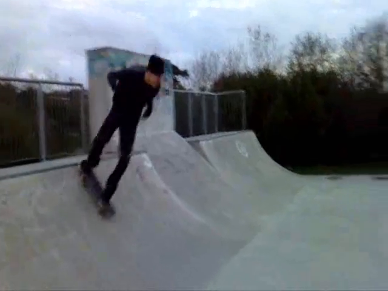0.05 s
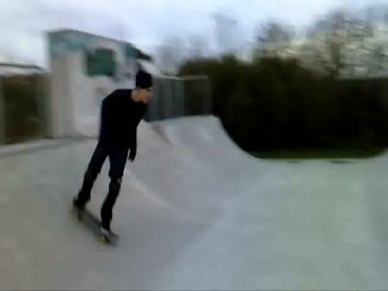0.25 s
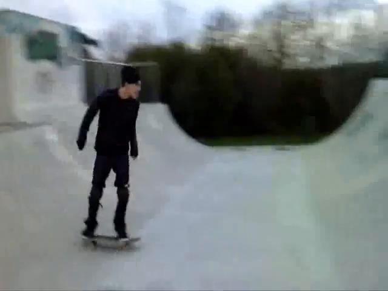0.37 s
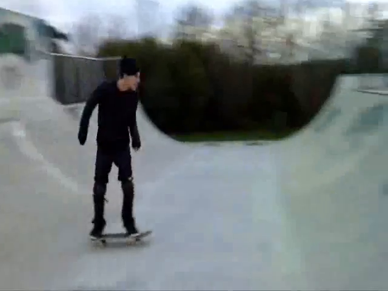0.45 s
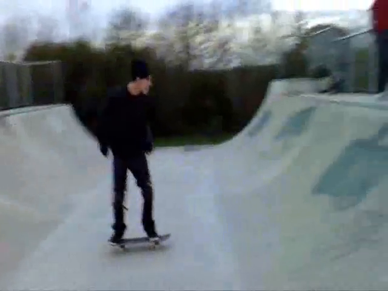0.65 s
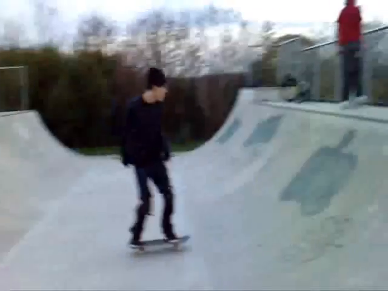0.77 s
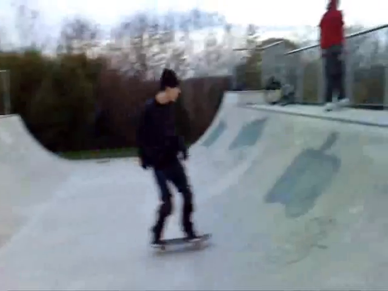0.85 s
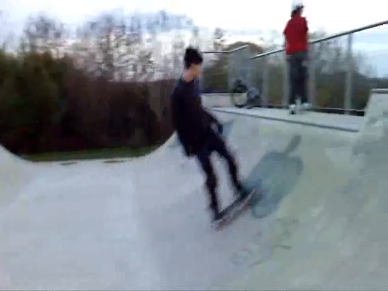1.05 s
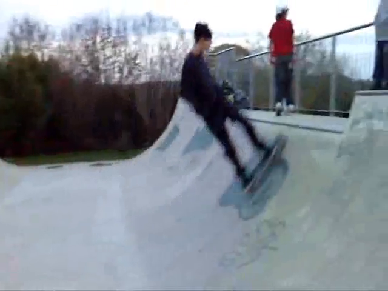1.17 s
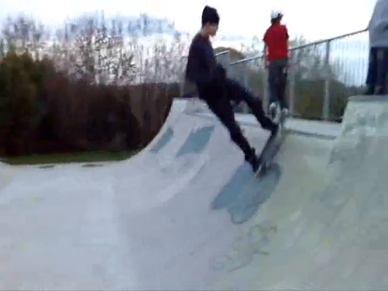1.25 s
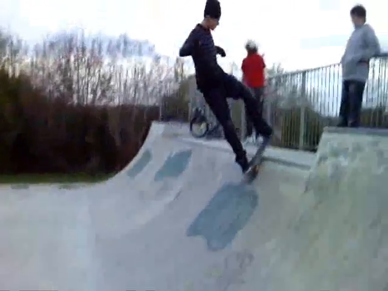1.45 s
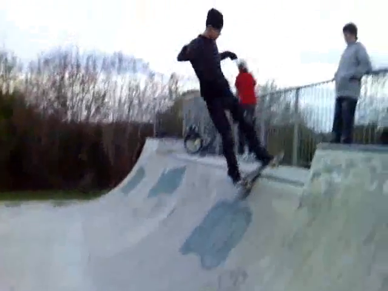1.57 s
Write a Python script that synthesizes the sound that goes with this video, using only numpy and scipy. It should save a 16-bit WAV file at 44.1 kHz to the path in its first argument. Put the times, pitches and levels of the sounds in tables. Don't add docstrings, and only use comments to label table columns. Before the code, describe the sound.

A skateboard drops into a concrete ramp with a hard slam, then rolls across with clacks

```python
import sys
import numpy as np
from scipy import signal
from scipy.io import wavfile
from scipy.ndimage import uniform_filter1d, map_coordinates

SR = 44100
rng = np.random.default_rng(int(sys.argv[2]) if len(sys.argv) > 2 else 0)


def dump(signal):
    limited = np.clip(np.atleast_2d(signal).T, -1, 1)
    pcm = np.round(limited * 32767).astype(np.int16)
    wavfile.write(sys.argv[1], SR, pcm)


def ratio(d):
    e = np.asarray(d, float) / 20
    return 10 ** e


N = 70560
T = np.arange(N) / SR


def level(x):
    return x / np.sqrt(np.mean(x ** 2))


def decay(t, t60):
    return np.exp(-np.log(1000) * t / t60)


def band(x, hz, width):
    b, a = signal.iirpeak(hz, hz / width, SR)
    return signal.lfilter(b, a, signal.lfilter(b, a, x))


def walk(rate):
    hold = int(SR / rate)
    steps = np.repeat(rng.standard_normal(N // hold + 1), hold)
    slewed = uniform_filter1d(uniform_filter1d(steps, hold), hold)
    return level(slewed[:N])


def park():
    # f/Hz, level/dB
    spectrum = [(30, 16), (100, -1), (300, -3.5), (850, 10.5), (1500, 4), (2600, -5), (5000, -6.5),
                (8000, -8), (12500, -19.5)]
    corner_hz, corner_db = np.array(spectrum).T
    out, swell = 0, walk(1.5)
    for hz in 30 * 2 ** np.arange(0, 8.8, .5):
        db = np.interp(np.log(hz), np.log(corner_hz), corner_db) + .6 * swell + walk(9)
        out = out + ratio(db) * band(rng.standard_normal(N), hz, hz / 2)
    return level(out) * ratio(-46)


def grit():
    bumps_per_s, spread_db = 3000, 2.2
    chance, size, sign = rng.random(N), rng.exponential(size=N), np.sign(rng.standard_normal(N))
    present = np.clip((bumps_per_s / SR - chance) * SR / 300, 0, 1)
    return level(present * sign * ratio(spread_db * size))


def rolling():
    # t/s, level/dB, load on the trucks/dB, wheel hiss/dB
    course = [(0, -87, -44, -18), (0.149, -58.5, -1, 3.5), (.27, -49.5, -2.5, -5), (.35, -41.5, -7, -2),
              (0.412, -35.5, -3.5, -8.5), (.47, -30, -2.5, -6.5), (.55, -29, -2.5, -4.5),
              (0.699, -28, -3, -5.5), (.765, -32, -4, -3), (.80, -35, -1.5, -2), (.92, -36.5, -1.5, -2.5),
              (1.017, -35, -1.5, -1), (1.028, -33.5, -13, -1), (1.099, -35.5, 3, -2),
              (1.219, -31.5, 0.5, -4.5), (1.36, -34.5, 4.5, -0.5), (1.49, -36, 1.5, -2.5),
              (1.6, -46, 3, 2.5)]
    # f/Hz, width/Hz, level/dB
    deck_ring = [(135, 36, -21), (263, 68, -15.5), (400, 113, -16), (543, 152, -5.5), (660, 125, 0.5),
                 (1080, 325, -8.5)]
    truck_ring = [(1380, 325, -5), (1641, 100, -5.5), (2004, 414, -2.5)]
    wheel_ring = [(3510, 580, -10), (4370, 570, -14), (4864, 720, -8), (6890, 720, -23), (8540, 3200, -34)]
    # t/s, resonance pitch ratio
    flexing = [(0, 1.19), (.4, 1.067), (.5, 0.992), (.7, 1.013), (.9, 1), (1.1, 1.02), (1.3, 0.94),
               (1.45, 0.91), (1.6, .85)]
    flicker_db, flicker_per_s, shared_db, shared_per_s = .7, 30, .7, 70

    s, base_db, load_db, hiss_db = np.array(course).T
    flex = np.interp(T, *np.array(flexing).T)
    shared = shared_db * walk(shared_per_s)
    common = grit()
    out = 0
    for part, extra_db, bend in ((deck_ring, 0, 1), (truck_ring, load_db, 0.79), (wheel_ring, hiss_db, 0)):
        bumps = common + grit()
        rings = 0
        for m, (hz, width, db) in enumerate(part):
            mode = level(band(bumps, hz, 1.59 * width)) * np.sqrt(width / 200)
            rings = rings + (-1) ** m * ratio(db + flicker_db * walk(flicker_per_s)) * mode
        rings = map_coordinates(rings, [np.cumsum(flex ** bend)], mode="mirror")
        out = out + ratio(np.interp(T, s, base_db + extra_db) + shared) * rings
    return out


def ring(x, hz, t60):
    r, w = decay(1, max(t60, 1e-3) * SR), 2 * np.pi * hz / SR
    return signal.lfilter([0, np.sin(w)], [1, -2 * r * np.cos(w), r * r], x)


def strikes(table, modes, crack_db):
    # f/Hz, width/Hz, level/dB
    crack = [(1260, 2150, -11), (2410, 3050, -14), (4170, 1500, -13.5), (6940, 4300, -27.5),
             (11600, 6500, -35)]
    rattle_per_s, crack_t60 = 7200, 0.044
    out, k = np.zeros(N), np.arange(3000) / SR
    for s, db, length, tilt_db in table:
        chance, force, detune = rng.random((3, len(k)))
        push = (chance < rattle_per_s / SR) * (2 * force - 1) * np.clip(2 * (1 - k / length), 0, 1)
        push[0] = 1
        push = push / np.sqrt(np.sum(push ** 2))
        noise = rng.standard_normal(len(k)) * decay(np.clip(k - length, 0, 1), crack_t60)
        y = 0
        for m, (hz, g, t60) in enumerate(modes):
            gain = (-1) ** m * ratio(g + tilt_db * np.log2(hz / 1000))
            y = y + gain * ring(push, hz * (1 + 0.017 * (detune[m] - .5)), t60)
        for hz, width, g in crack:
            gain = ratio(crack_db + g + tilt_db * np.log2(hz / 1000))
            y = y + gain * band(noise, hz, width) * np.sqrt(SR / width / 2)
        i = int(s * SR)
        out[i:i + len(y)] += ratio(db) * y[:N - i]
    return out


def scrape():
    # t/s, level/dB, rattle length/s, tilt/(dB per octave)
    contacts = [
        (.1900, -32, 0.024, -8),
        (.2178, -17, .003, 0),
        (.2215, -13, .006, 0),
        (.2275, -21, .004, 3),
        (.2320, -19, .012, 0),
        (.2430, -21.5, 0.0079, 0.5),
        (.2600, -45, 0.012, 1),
    ]
    # f/Hz, level/dB, t60/s
    edge = [(662, -1.5, .03), (1050, -4, .03), (1760, -5, .015), (2056, -1.5, .015), (3900, -17, .006),
            (4700, -11, .008), (5300, -14, .006)]
    return strikes(contacts, edge, crack_db=-5.0)


def thumps():
    # t/s, level/dB, f/Hz, t60/s
    knocks = [
        (0.319, -44, 170, 0.048),
        (.335, -32.5, 400, 0.017),
        (0.365, -56, 60, .05),
        (0.431, -38.5, 132, 0.051),
        (0.558, -45.5, 135, 0.31),
        (1.334, -18.5, 260, 0.017),
        (1.435, -39, 111, 0.053),
        (1.454, -39, 90, 0.06),
        (1.467, -26.5, 165, 0.018),
    ]
    out = 0
    for s, db, hz, t60 in knocks:
        age = np.clip(T - s, 0, None)
        out = out + ratio(db) * np.sin(2 * np.pi * hz * age) * decay(age, t60)
    return out


def clinks():
    # t/s, level/dB, rattle length/s, tilt/(dB per octave)
    contacts = [
        (.3230, -44, .003, 5),
        (.3490, -45, .002, 2),
        (1.072, -38, .004, 5),
        (1.5235, -21, .002, 0),
        (1.541, -29, .004, 0),
    ]
    # f/Hz, level/dB, t60/s
    nut = [(3700, -3, .008), (4050, 0, .012), (4900, -7, .008), (6500, -12, .005), (8500, -18, .004)]
    return strikes(contacts, nut, crack_db=-12)


def slam():
    # t/s, level/dB, rattle length/s, tilt/(dB per octave)
    contacts = [(.3560, -21, .003, -1), (.3617, -1.5, .0006, 0), (.3644, -3, .0006, 0),
                (.3664, -2.5, .0008, 1), (.3686, -5, .002, -5), (.3755, -17, .003, 0),
                (.3790, -17, .003, -4), (.3880, -26, .008, -2), (.6700, -26, .012, -1),
                (.6850, -17, .012, -1), (.6990, -24, .004, -4), (.7520, -24, .008, -3)]
    # f/Hz, level/dB, t60/s
    deck = [(484, -22, 0.013), (698.5, 0, 0.031), (960, -8, 0.019), (1110, -18, 0.0067), (1301, 3.5, 0.019),
            (1680, -4.5, .015), (1930, -4.5, 0.0084), (3600, -9.5, 0.0071), (4730, -29, 0.0034)]
    return strikes(contacts, deck, crack_db=-4.5)


def ticks():
    # t/s, level/dB, rattle length/s, tilt/(dB per octave)
    contacts = [
        (.9215, -18, .002, 1),
        (.9235, -15, .003, 1),
        (.9295, -23, .004, 1),
        (.9350, -27, .014, 1),
    ]
    # f/Hz, level/dB, t60/s
    bolt = [(2250, -5, .01), (2950, -3, .016), (4269, 0, .022), (4650, -6, .014), (6500, -16, .006)]
    return strikes(contacts, bolt, crack_db=-8.5)


def ramp_echo(hits):
    build_s, t60 = .006, .05
    k = np.arange(6000) / SR
    tail = rng.standard_normal(len(k)) * decay(k, t60) * np.clip(k / build_s, 0, 1)
    return ratio(-15) * signal.fftconvolve(hits, tail / np.sqrt(np.sum(tail ** 2)))[:N]


def scene():
    hits = scrape() + clinks() + slam() + ticks()
    high_pass = signal.butter(2, 300, "high", fs=SR, output="sos")
    hits = signal.sosfilt(high_pass, hits + ramp_echo(hits))
    return (park() + rolling() + hits + thumps())[None]


def treble_gate(x):
    # f/Hz, level under the whole sound/dB
    threshold = [(8000, -56), (9000, -47), (10000, -42), (11000, -42), (11800, -45), (12300, -51),
                 (13000, -52)]
    width_hz = 260
    f, _, z = signal.stft(x, SR, nperseg=2048)
    power = np.abs(z) ** 2
    hz, db = np.array(threshold).T
    for lo in np.arange(hz[0], hz[-1], width_hz):
        sel = (f >= lo) & (f < lo + width_hz)
        patch_db = 5 * uniform_filter1d(rng.standard_normal(power.shape[1]), size=3)
        limit = power.sum(axis=0) * ratio(2 * (np.interp(lo, hz, db) + patch_db))
        z[sel] *= np.clip(10 * (power[sel].sum(axis=0) / limit - 1), 0, 1)
    return signal.istft(z, SR, nperseg=2048)[1][:N]


def band_limit(x):
    return signal.sosfilt(signal.butter(12, 15700, fs=SR, output="sos"), x)


def record(dry):
    ceiling = 1.15
    x = signal.sosfilt(signal.ellip(8, .2, 60, 12750, fs=SR, output="sos"), dry)
    x = signal.lfilter(*signal.butter(2, 0.93 * 90, "high", fs=SR), x[0])
    x = ceiling * np.tanh(treble_gate(x)[None] / ceiling)
    return band_limit(x)


dry = scene()
out = record(dry)
dump(out)
```